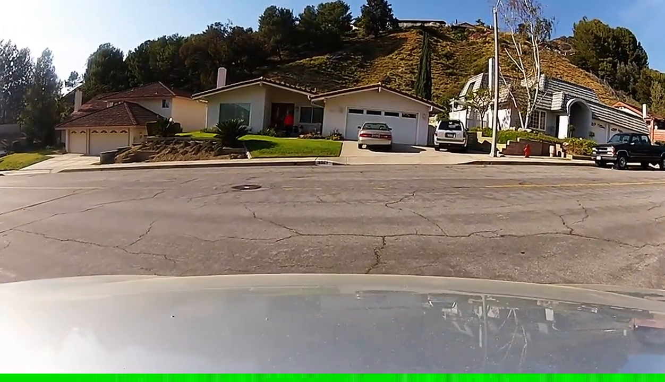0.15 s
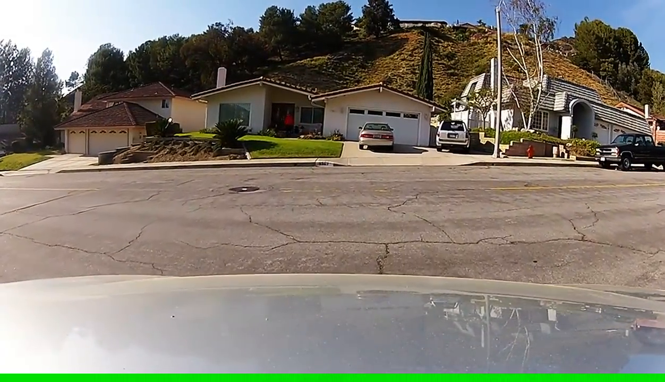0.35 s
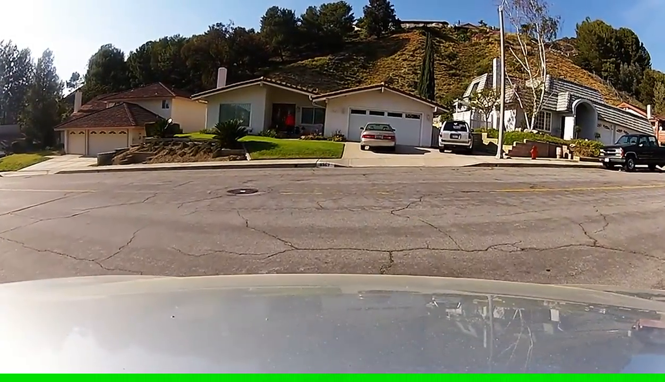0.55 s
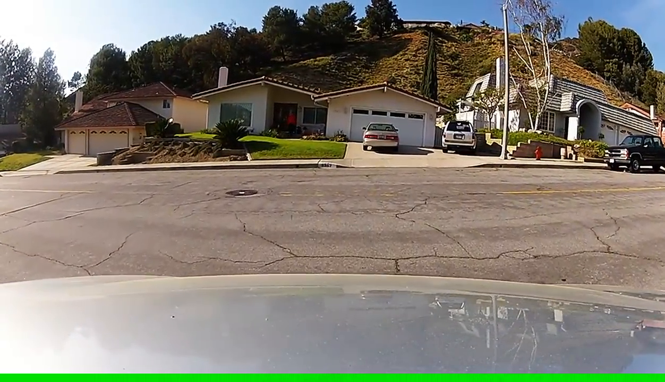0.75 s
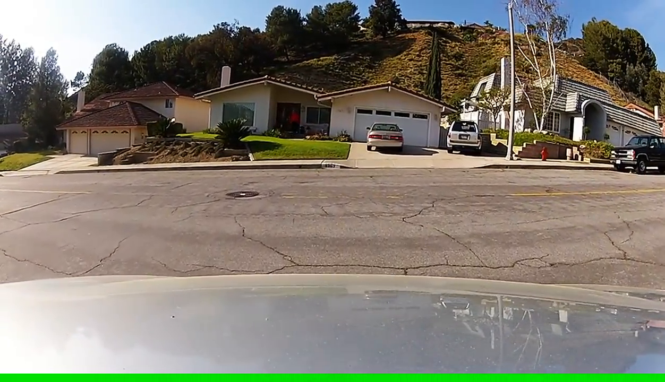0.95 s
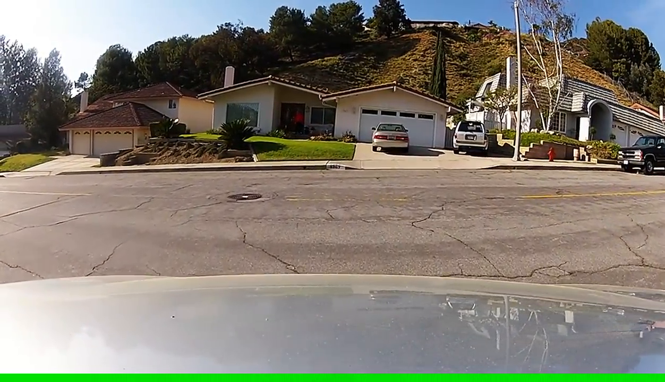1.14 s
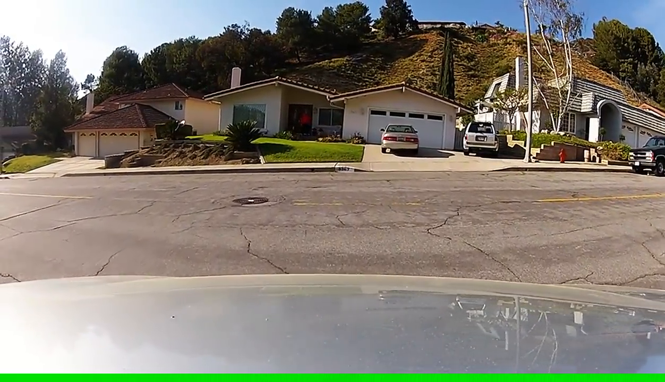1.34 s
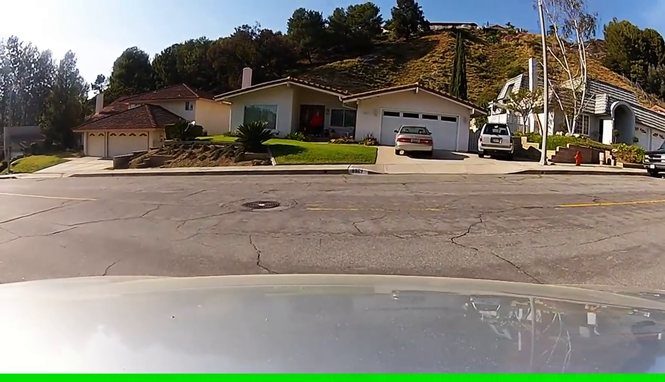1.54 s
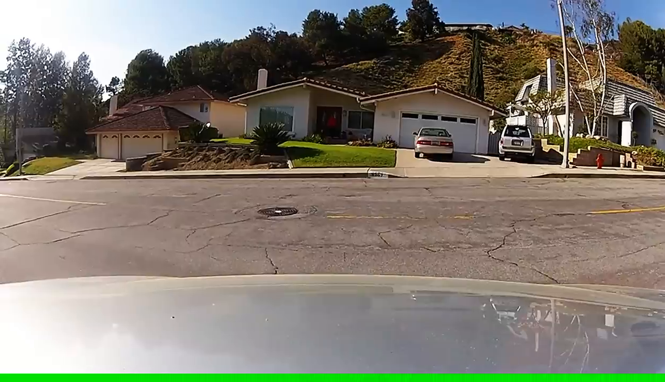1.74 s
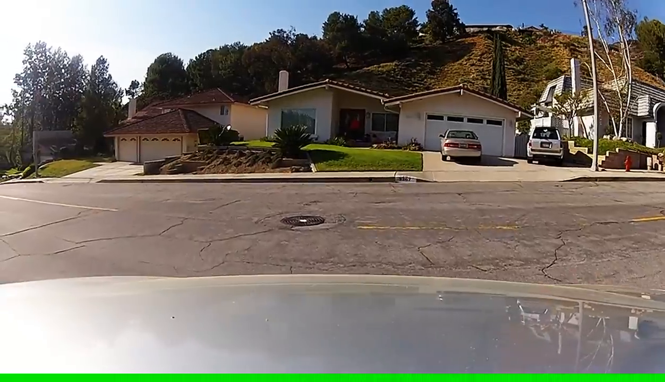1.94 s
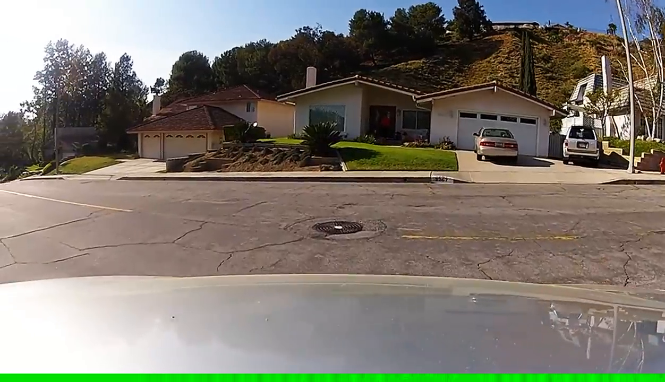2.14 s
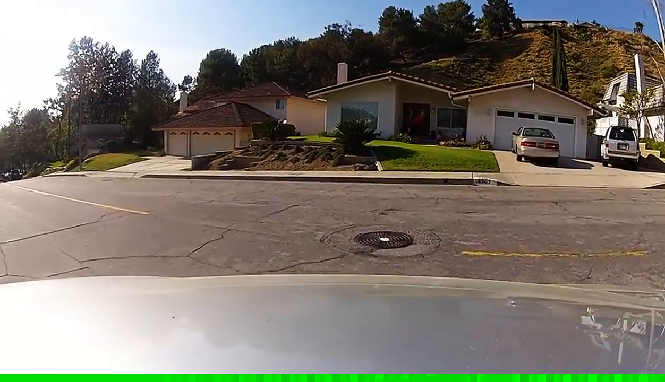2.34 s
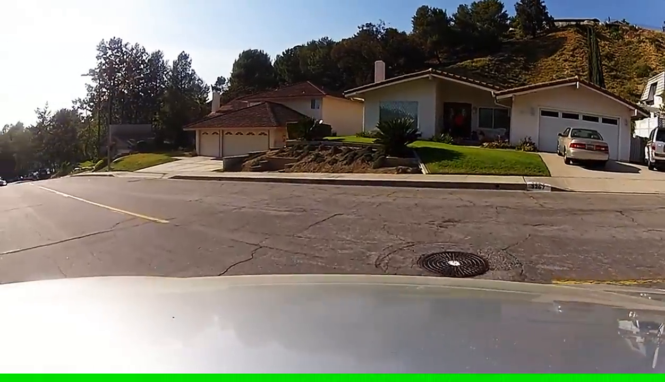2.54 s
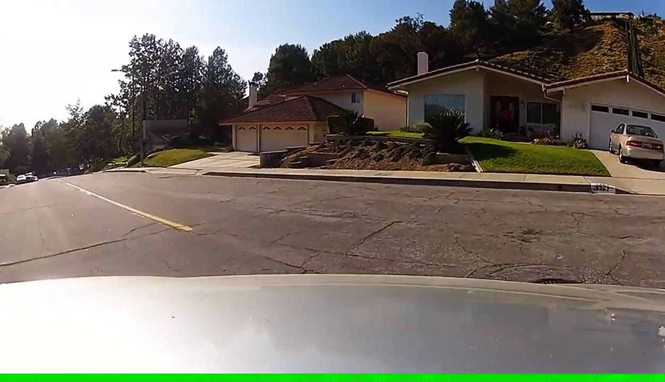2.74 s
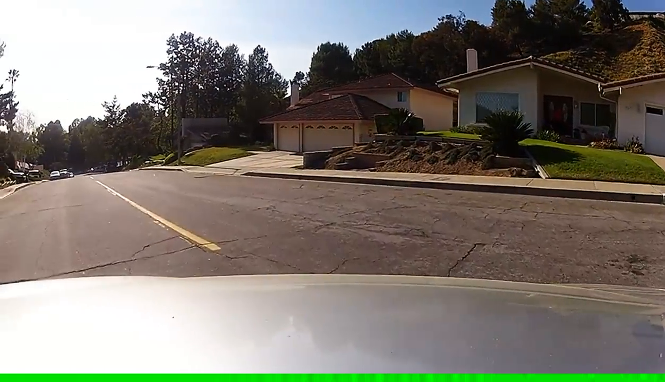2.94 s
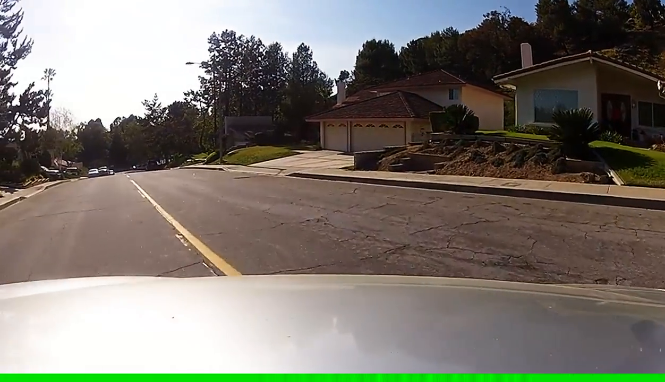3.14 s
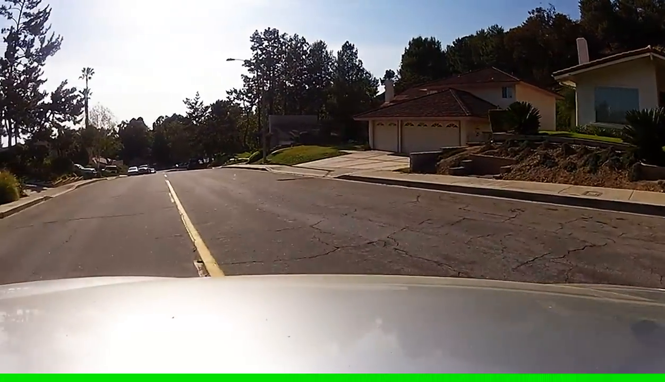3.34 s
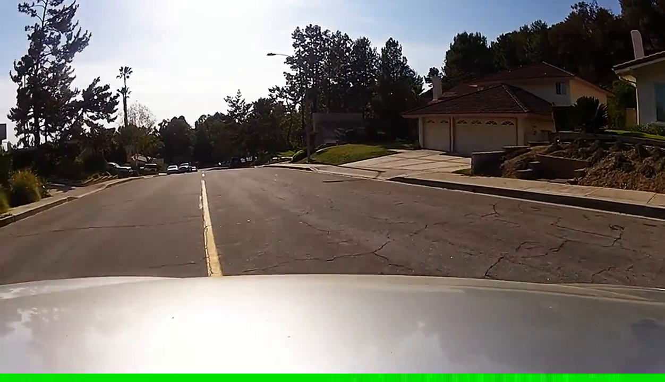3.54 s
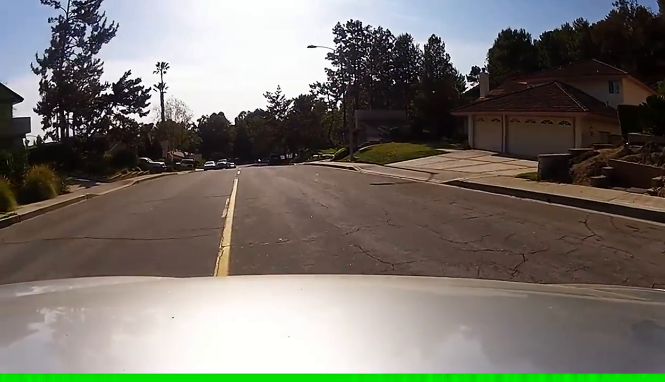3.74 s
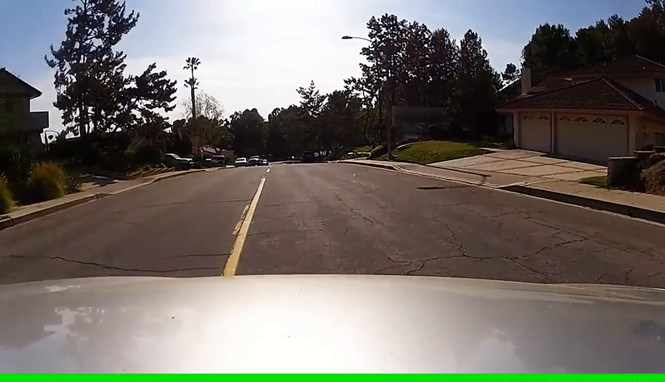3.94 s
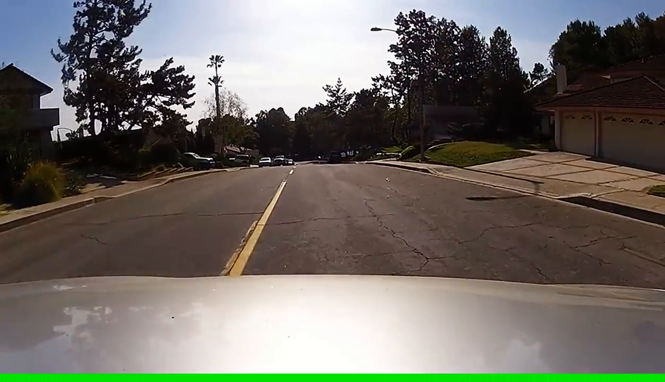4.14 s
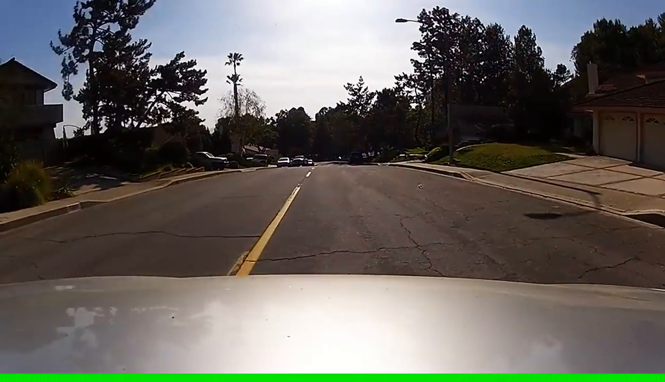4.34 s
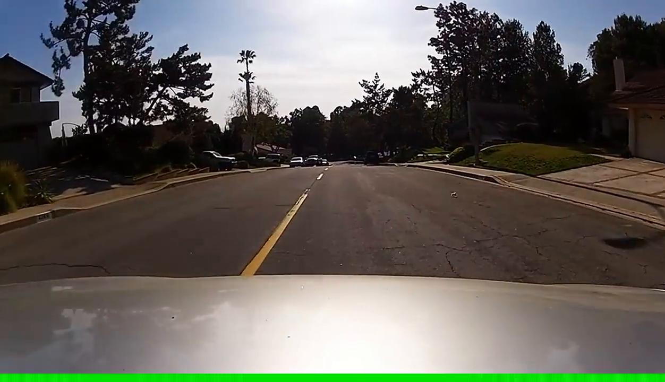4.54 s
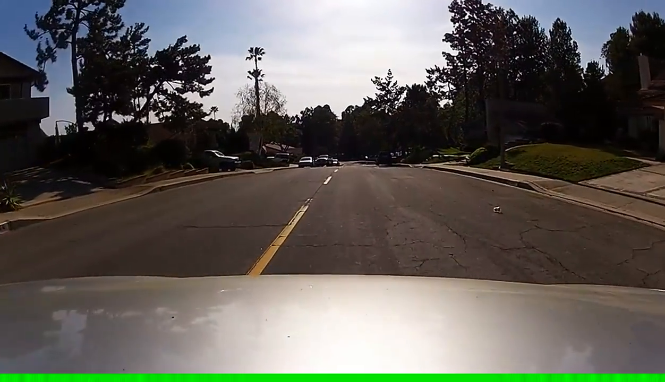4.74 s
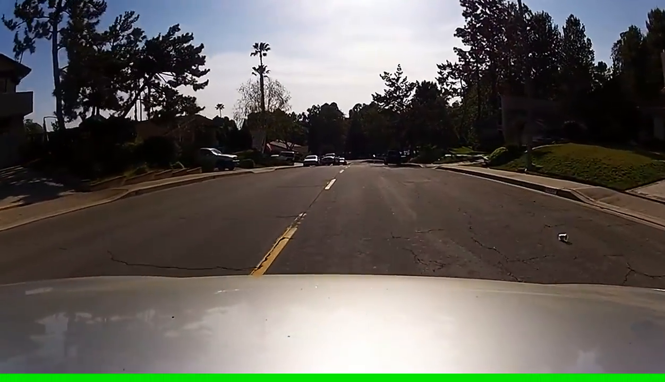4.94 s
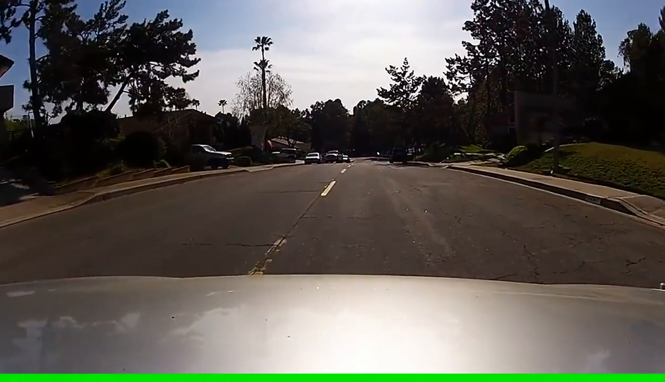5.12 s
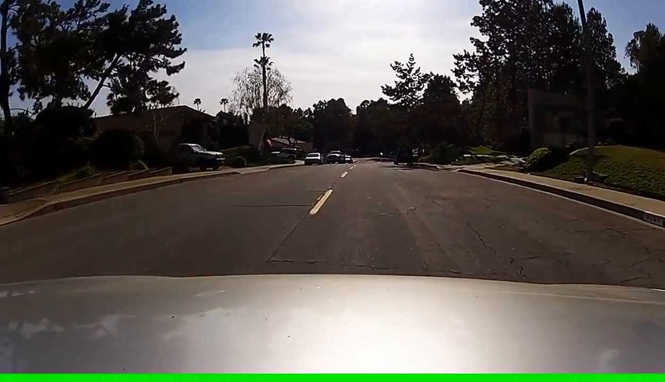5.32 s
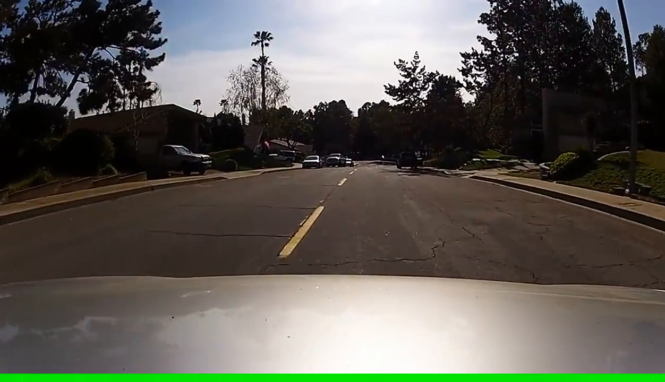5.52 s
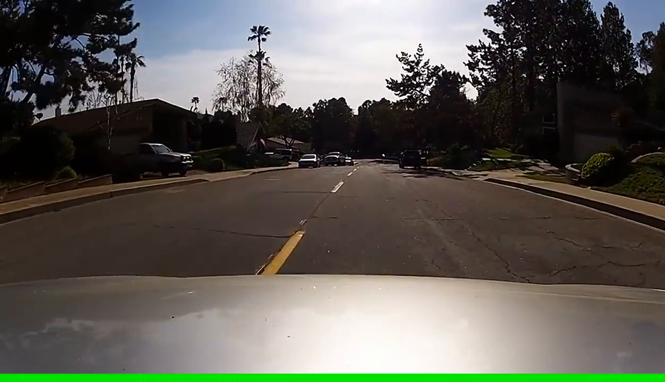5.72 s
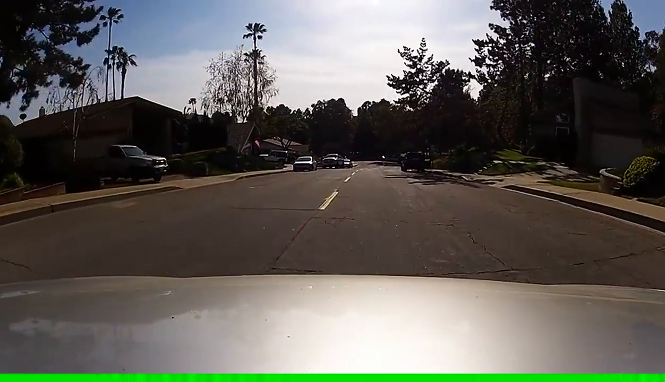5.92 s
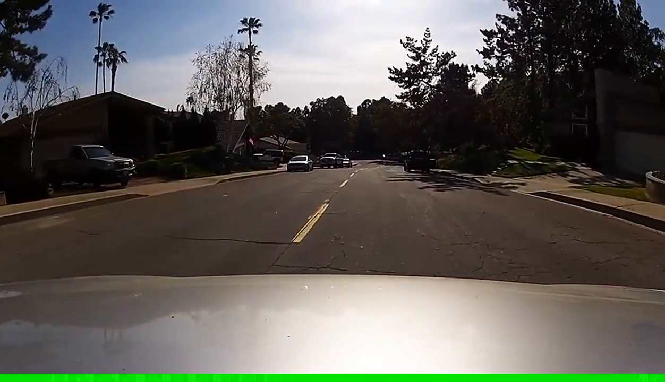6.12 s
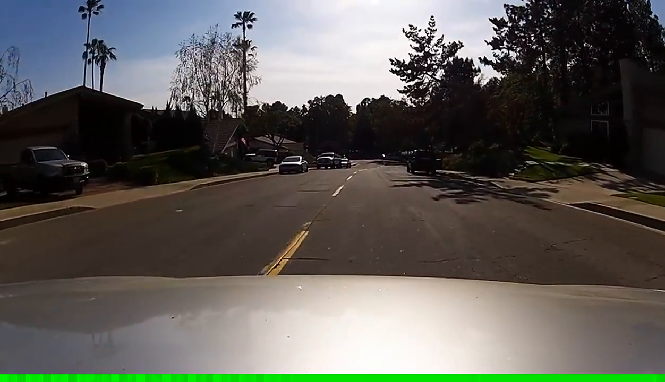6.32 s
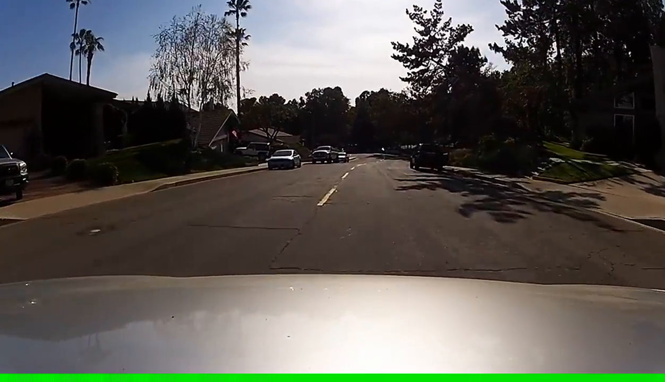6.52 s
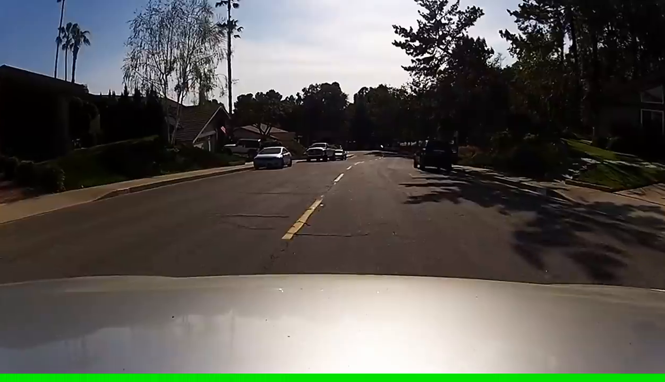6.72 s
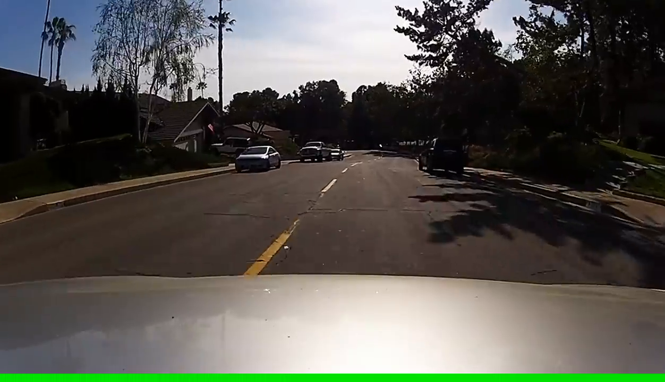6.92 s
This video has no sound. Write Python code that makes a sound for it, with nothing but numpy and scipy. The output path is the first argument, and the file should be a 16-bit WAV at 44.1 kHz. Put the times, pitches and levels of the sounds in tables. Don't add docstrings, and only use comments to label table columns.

```python
import sys
import numpy as np
from scipy import signal
from scipy.fft import rfft, irfft
from scipy.io import wavfile
from scipy.ndimage import map_coordinates

SR = 44100
rng = np.random.default_rng(int(sys.argv[2]) if len(sys.argv) > 2 else 0)


def invert_db(level):
    return 10 ** (np.asarray(level, dtype=float) / 20)


def generate_wav(signal):
    frames = np.transpose(np.atleast_2d(signal))
    scaled = np.clip(frames, -1, 1) * 32767
    pcm = np.round(scaled).astype(np.int16)
    wavfile.write(sys.argv[1], SR, pcm)


N = 311787

CYLINDER_PUSH = [1.2, 1.1, 1.3, -.7, 1.2, -.8, -.6, .7]
# time in seconds, accessory pulley rate in Hz.
PULLEY_RATE = [(0, 7.2), (.9, 7.2), (1.3, 8.5), (1.8, 9.3), (2.4, 11), (2.9, 13), (3.3, 15.5), (4.0, 19.3),
               (4.55, 23), (4.88, 24.7), (5.1, 24), (5.5, 21.9), (5.68, 19), (5.8, 19.5), (6.2, 22.2),
               (6.6, 23.3), (6.95, 24.6), (7.07, 24.75)]
# time in seconds, firing level in dB.
FIRING_LEVEL = [(0, -67), (.9, -58), (1.1, -57.5), (1.4, -59), (1.8, -41), (2.0, -56.5), (2.4, -44),
                (3.0, -36.5), (3.6, -37), (4.3, -35.5), (4.65, -30.5), (4.9, -33), (5.1, -37), (5.45, -38),
                (5.8, -34.5), (6.3, -31), (6.7, -35), (7.07, -33.5)]
# time in seconds, speed in m/s.
ROAD_SPEED = [(0, 0.39), (1, 0.4), (1.8, 1.48), (2.2, 1.6), (3, 3.5), (3.5, 5.3), (4, 7.6), (4.7, 8.14),
              (5.3, 10.34), (6, 9.47), (7.07, 12.34)]
# frequency in Hz, level in dB per Hz.
PANEL_SPECTRUM = [(21, -31), (35, -3.5), (60, -15), (102, -9.5), (140, -10.5), (166, -3), (183, 1.5),
                  (222, -7.5), (267, -14.5), (375, -17.5), (408, -20.5), (588, -27), (640, -41),
                  (830, -63.5), (1410, -120)]
# centre in Hz, width in Hz, lift in dB.
PANEL_RESONANCES = [(113.4, 25, 6), (176.96, 9.7, 7), (216.8, 11.7, 8.5), (368, 5.1, -1), (456, 17, 4)]
# multiple of the pulley rate, level in dB.
PUMP_ORDERS = [(28.45, 3), (38, -4), (47.5, -11), (57, -11), (76, -15)]
# centre in Hz, width in Hz, lift in dB.
PUMP_BRACKET = [(560, 120, -12), (635, 60, -11), (700, 25, 4), (725, 18, 4), (775, 50, -10), (840, 22, 11),
                (890, 40, -8), (1150, 200, -4)]
# centre in seconds, width in seconds, lift in dB.
STEERING_STRAIN = [
    (3.98, .16, 7),
    (4.95, 0.24, 2.5),
    (5.8, .12, -4),
]
# centre in seconds, width in seconds, pitch in Hz, level in dB.
INTAKE_DRONES = [
    (1.6, 0.18, 432, -59),
    (6.0, 0.33, 337, -39),
]
# start in seconds, end in seconds, pitch in Hz, drift in Hz per second, level in dB.
BELT_WHISTLES = [
    (.48, 1.3, 1095, -42, -61),
    (1.3, 1.6, 1066, 60, -58),
    (.56, 1.02, 1648, -55, -59),
    (.98, 1.27, 1630, 650, -62),
    (.62, 1.05, 1425, -35, -66),
]
# time in seconds, rocking rate in Hz, level in dB, 60 dB decay in seconds.
MOUNT_JOLTS = [(0, 23.9, -34, 3.6), (1.12, 23.5, -43, .8), (1.62, 25, -42, 2.4), (2.1, 22.6, -37, 1.4),
               (2.4, 24, -36, .7), (2.7, 27, -38.5, 0.88), (2.93, 25.4, -32.5, 2.2), (3.17, 24.5, -34, 1.3),
               (3.62, 23.4, -26.5, 2.3), (4.031, 23.3, -21, 1.1), (4.3, 23.9, -41, .6), (4.68, 23, -42, .8),
               (4.87, 26.3, -28, 0.8), (5.101, 23.4, -17.5, 0.69), (5.45, 23.6, -29, .6),
               (5.69, 26.8, -32, 0.41), (5.9, 27.4, -27, 1.1), (6.17, 23.4, -24, 1.2),
               (6.42, 24.8, -22.5, 2.2)]
# centre in seconds, width in seconds, boom lift in dB, thrum lift in dB.
ROAD_BUMPS = [(.05, 0.088, -1, 6), (.4, .06, -10.5, 1.5), (.6, 0.073, 4, -6), (1.1, 0.18, -5.5, -3.5),
              (1.82, 0.1, 5, 0), (2.15, 0.14, 2.5, 3), (2.5, 0.076, 6, 3.5), (2.7, 0.036, 0, -1),
              (3.17, 0.054, 6.5, 4), (3.33, 0.053, -3.5, 4), (3.66, 0.13, 5.5, -5),
              (4.42, 0.094, -5.5, 4.5), (4.8, 0.056, 4, -3.5), (5.05, 0.066, -6.5, 1.5),
              (5.35, 0.083, -1, 7), (5.75, 0.1, 2, 2), (5.97, 0.071, 5, 3), (6.28, 0.035, 5.5, -9),
              (6.48, 0.053, 5.5, -19), (6.82, 0.032, -10, -3), (6.93, 0.046, 0, 4.5)]
# frequency in Hz, level in dB per Hz.
WIND_SPECTRUM = [(350, -57.5), (600, -14), (714, 2.5), (786, -6), (857, 1.5), (1000, -4.5), (1120, -0.5),
                 (1470, -3), (2360, 0.5), (2750, -3.5), (2910, -14), (3180, -9), (4160, -23), (4580, -17.5),
                 (6000, -28), (7800, -72), (13200, -120)]
# frequency in Hz, level in dB per Hz.
FAN_SPECTRUM = [(350, -56), (600, -25), (630, -11.5), (707, 1), (786, -15.5), (849, -5.5), (1010, -16.5),
                (1100, -14.5), (1260, -23), (1620, -16.5), (1960, -21.5), (2270, -15.5), (2650, -31.5),
                (5240, -39), (6000, -85), (7800, -102), (13200, -120)]
# centre in Hz, width in Hz, lift in dB.
CASE_RESONANCES = [(666, 24, 2), (744.4, 40, 6.5), (816, 18, 2.5), (1050, 51, -0.5), (1108, 51, 4),
                   (1632, 22, 4.5), (1860, 80, 2), (2048, 40, -7.5), (2370, 410, 2), (2570, 67, -4),
                   (3013, 48, -12.5), (3072, 155, 9), (3547, 50, 7.5), (3828, 184, 10), (4200, 100, 4)]
# centre in seconds, width in seconds, lift in dB.
ROADSIDE_GUSTS = [(2.4, 0.087, 3), (4.43, 0.0098, 1), (4.67, 0.044, 2), (4.8, 0.051, 3.5), (5.37, .04, 3.5),
                  (5.49, 0.049, 8.5), (5.6, 0.073, 7.5), (5.71, 0.045, 5.5), (5.97, .03, 4),
                  (6.08, 0.048, 8), (6.3, 0.14, 0.5), (6.48, 0.059, 8.5), (6.74, 0.085, 6.5),
                  (6.94, 0.027, 10), (7.02, 0.059, 5)]

BELT_RATIO = 1.015


def engine():
    (pulley_hz,) = curves(PULLEY_RATE)
    turns = np.cumsum(pulley_hz) / SR
    firings_per_turn = len(CYLINDER_PUSH) / BELT_RATIO
    firing_phase = turns * firings_per_turn
    shake = engine_shake(firing_phase, pulley_hz * firings_per_turn)
    return exhaust(firing_phase) + shake + pump(turns, pulley_hz)


def exhaust(firing_phase):
    (load_db,) = curves(FIRING_LEVEL)
    fired = np.flatnonzero(np.diff(np.floor(firing_phase)))
    pulses = np.zeros(N)
    unevenness = invert_db(0.9 * rng.standard_normal(len(fired)))
    pulses[fired] = np.resize(CYLINDER_PUSH, len(fired)) * unevenness
    body = through(pulses, PANEL_SPECTRUM, PANEL_RESONANCES, 42, 375, skirt=3.0)
    bark = through(pulses, PANEL_SPECTRUM, PANEL_RESONANCES, 241, 482)
    return invert_db(load_db) * body + invert_db(load_db - 9) * bark


def engine_shake(firing_phase, firing_hz):
    resonance_hz, width_hz, level_db = 63.5, 10, -46.5
    response = 1 / (1 + (2 * (firing_hz - resonance_hz) / width_hz) ** 4)
    return invert_db(level_db) * response * np.sin(2 * np.pi * firing_phase)


def pump(turns, pulley_hz):
    level_db, idle_drop_db, wakes_hz, spread_hz = -42, 18, 9.3, 0.73
    asleep = 1 / (1 + np.exp((pulley_hz - wakes_hz) / spread_hz))
    whine_db = level_db - idle_drop_db * asleep + swells(STEERING_STRAIN)[0]
    whine = np.zeros(N)
    for order, db in PUMP_ORDERS:
        hz = order * pulley_hz
        case_db = 1.2 * colour_db(hz, WIND_SPECTRUM, CASE_RESONANCES)
        bracket_db = colour_db(hz, [(20, 0)], PUMP_BRACKET)
        gain = invert_db(db + case_db + bracket_db + 1.2 * wobble(6.7))
        whine += gain * np.sin(2 * np.pi * order * turns + 0.2 * wobble(10))
    return invert_db(whine_db) * whine


def intake():
    half_width_hz = 22
    drones = np.zeros(N)
    for s, width_s, hz, db in INTAKE_DRONES:
        swell = swells([(s, width_s, 1)])[0]
        tone = through(noise(1, 16), [(20, 0.0052)], [], hz - half_width_hz, hz + half_width_hz)
        drones += invert_db(db) * swell * tone
    return drones


def whistles():
    t = np.arange(N) / SR
    fade_s = 0.064
    tones = np.zeros(N)
    for start, end, hz, drift, db in BELT_WHISTLES:
        fade = np.clip(np.minimum(t - start, end - t) / fade_s, 0, 1)
        pitch_hz = hz + drift * (t - start) + 6 * wobble(5)
        tones += invert_db(db + 2.9 * wobble(15.1)) * fade * np.sin(2 * np.pi * np.cumsum(pitch_hz) / SR)
    return tones


def mount():
    rise_s = 0.04
    swing, size = np.zeros(N), np.zeros(N)
    for s, hz, db, t60 in MOUNT_JOLTS:
        at = max(round(s * SR), 0)
        t = np.arange(min(N - at, round(t60 * SR))) / SR
        ring = invert_db(db - 60 * t / t60) * (1 - np.exp(-(t / rise_s) ** 2))
        swing[at:at + len(t)] += np.sqrt(2) * ring * np.sin(2 * np.pi * hz * t)
        size[at:at + len(t)] += ring
    rattle = through(noise(1.5, 11), [(20, -1.5), (45, 1.5)], [], 17, 41)
    return swing + 0.27 * size * rattle


def road():
    boom_db, thrum_db = swells(ROAD_BUMPS)
    thrum = through(noise(0.31, 5.4), PANEL_SPECTRUM, PANEL_RESONANCES, 36.2, 137.0)
    boom = through(noise(0.44, 12), PANEL_SPECTRUM, PANEL_RESONANCES, 132.7, 280.4)
    drone = through(noise(0.52, 12), PANEL_SPECTRUM, PANEL_RESONANCES, 259.0, 596)
    thrum *= level(rest_db=-60, cruise_db=-30, speed_power=0.61, load_share=0.07, lift_db=thrum_db)
    boom *= level(rest_db=-49.5, cruise_db=-24.5, speed_power=0.42, load_share=0.53, lift_db=boom_db)
    drone *= level(rest_db=-56, cruise_db=-42, speed_power=0.8, load_share=0.4)
    return thrum + boom + drone


def air():
    (gust_db,) = swells(ROADSIDE_GUSTS)
    fan_on_s, fan_rise_s, fan_lift_db = 0.65, 0.11, 3
    fan_db = fan_lift_db / (1 + np.exp((fan_on_s - np.arange(N) / SR) / fan_rise_s))
    flutter = 0.45 * wobble(20) + 0.6 * wobble(60)
    rush_db, gusty_db = 0.8 * flutter + 0.16 * gust_db, flutter + gust_db
    bay = air_band(530, 1270) * level(rest_db=-51, cruise_db=-38, speed_power=0.75, load_share=0.43)
    rush = air_band(1254, 2474) * level(rest_db=-57, cruise_db=-36.5, speed_power=0.93, load_share=0.42,
                                        lift_db=rush_db, rest_lift_db=fan_db)
    gust = air_band(2568, 4320) * level(rest_db=-66.5, cruise_db=-41.5, speed_power=1.5, load_share=0.49,
                                        lift_db=gusty_db)
    hiss = air_band(4480, 7000) * level(rest_db=-78.5, cruise_db=-55, speed_power=2.5, load_share=0.82,
                                        lift_db=gusty_db)
    return bay + rush + gust + hiss


def air_band(lo_hz, hi_hz):
    (speed,) = curves(ROAD_SPEED)
    equal_m_s = 4.33
    wind = speed ** 4 / (speed ** 4 + equal_m_s ** 4)
    fan_noise = through(noise(0.4, 30), FAN_SPECTRUM, CASE_RESONANCES, lo_hz, hi_hz, skirt=9.6)
    wind_noise = through(noise(0.24, 30), WIND_SPECTRUM, CASE_RESONANCES, lo_hz, hi_hz, skirt=8.2)
    return np.sqrt(1 - wind) * fan_noise + np.sqrt(wind) * wind_noise


def level(rest_db, cruise_db, speed_power, load_share, lift_db=0, rest_lift_db=0):
    (speed,), (load_db,) = curves(ROAD_SPEED), curves(FIRING_LEVEL)
    cruise_m_s, full_load_db = 10, -30
    loaded = invert_db(cruise_db + load_share * (load_db - full_load_db))
    moving = loaded * (np.abs(speed) / cruise_m_s) ** speed_power
    return invert_db(lift_db) * np.hypot(invert_db(rest_db + rest_lift_db), moving)


def swells(rows):
    t = np.arange(0, N / SR + 0.01, 0.002)
    lift_db = sum(np.outer(np.exp(-((t - s) / w) ** 2), lifts) for s, w, *lifts in rows)
    return curves(np.column_stack([t, lift_db]))


def curves(rows):
    s, *cols = np.transpose(rows)
    return [np.interp(np.arange(N) / SR, s, c) for c in cols]


def wobble(rate):
    coarse = np.arange(0, N + 32, 32)
    knots = rng.standard_normal(int(N * rate / SR) + 4)
    return np.interp(np.arange(N), coarse, map_coordinates(knots, [coarse * rate / SR]))


def noise(flutter_db, rate):
    return rng.standard_normal(N) * invert_db(flutter_db * wobble(rate))


def colour_db(hz, spectrum, modes):
    f, v = np.transpose(spectrum)
    lifts = sum(db / (1 + (2 * (hz - c) / w) ** 2) for c, w, db in modes)
    return np.interp(np.log(hz + 1), np.log(f + 1), v) + lifts


def through(x, spectrum, modes, lo_hz, hi_hz, skirt=6):
    m = 2 ** 15
    hz = np.fft.rfftfreq(m, 1 / SR) + 1
    edges = 1 / np.sqrt((1 + (lo_hz / hz) ** (2 * skirt)) * (1 + (hz / hi_hz) ** (2 * skirt)))
    cepstrum = irfft(np.log(invert_db(colour_db(hz, spectrum, modes)) * edges + 1e-6), m)
    cepstrum[1:m // 2] *= 2
    cepstrum[m // 2 + 1:] = 0
    response = irfft(np.exp(rfft(cepstrum)), m)
    return unit(signal.oaconvolve(x, response)[:N])


def unit(x):
    return x / np.sqrt(np.mean(x ** 2) + 1e-20)


def scene():
    return (engine() + intake() + whistles() + mount() + road() + air())[None]


def low_pass(x):
    return signal.sosfilt(signal.butter(12, 15290, fs=SR, output="sos"), x)


def record(dry):
    slow = signal.resample_poly(dry, 12000, SR, axis=1)
    held = np.repeat(slow, 4, axis=1)
    mix = signal.resample_poly(held, SR, 48000, axis=1)
    mix = np.pad(mix, ((0, 0), (0, 8)))[:, :N]
    return low_pass(mix)


dry = scene()
out = record(dry)
generate_wav(out)
```